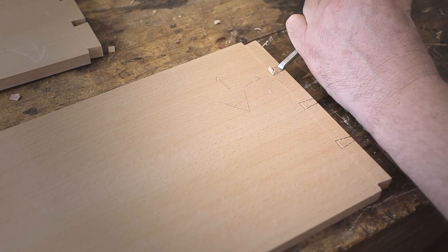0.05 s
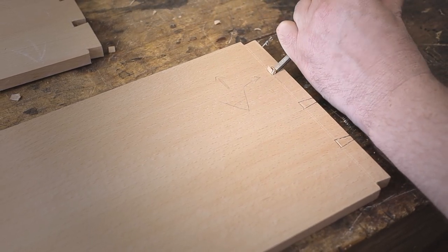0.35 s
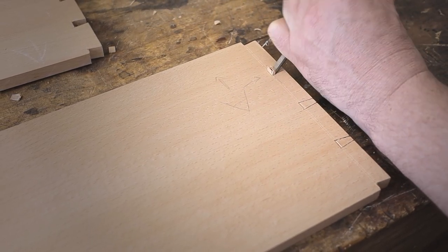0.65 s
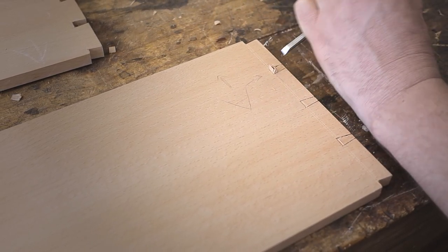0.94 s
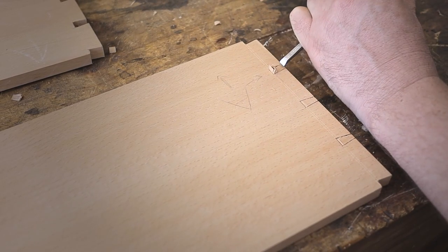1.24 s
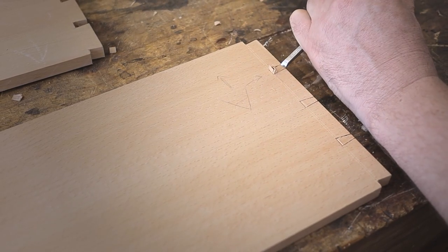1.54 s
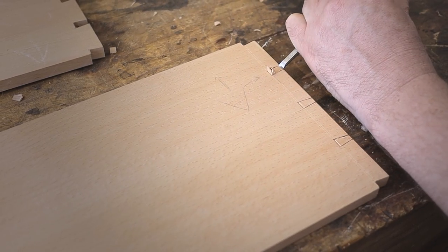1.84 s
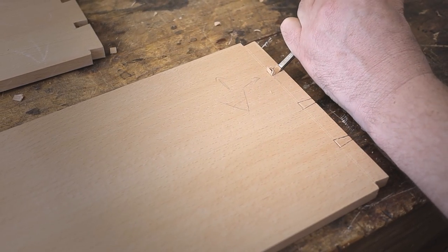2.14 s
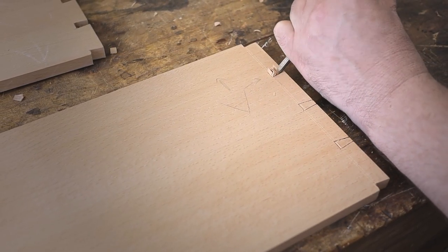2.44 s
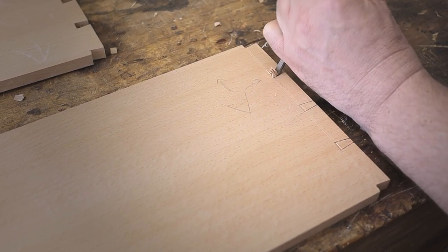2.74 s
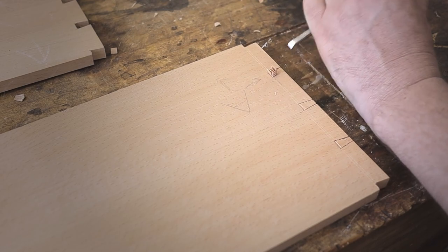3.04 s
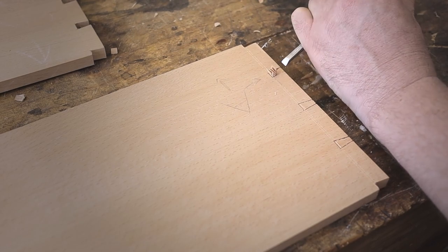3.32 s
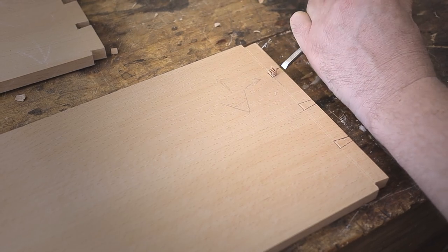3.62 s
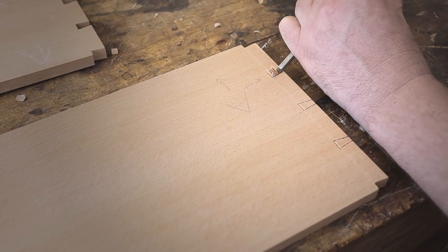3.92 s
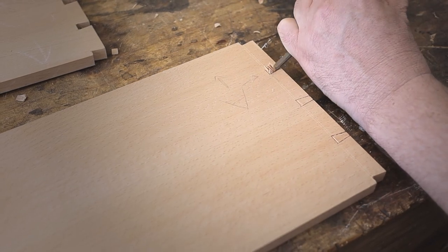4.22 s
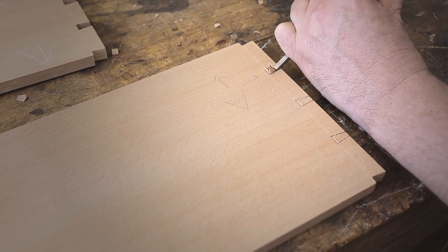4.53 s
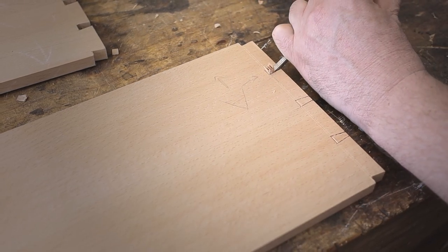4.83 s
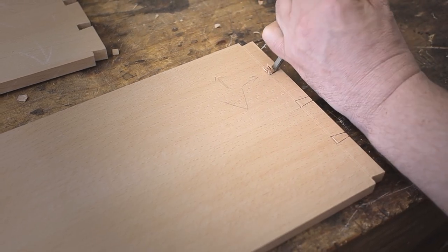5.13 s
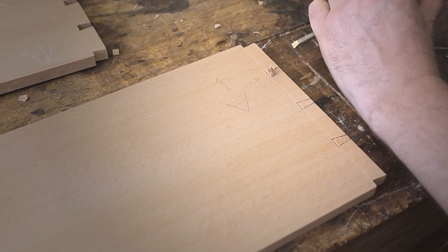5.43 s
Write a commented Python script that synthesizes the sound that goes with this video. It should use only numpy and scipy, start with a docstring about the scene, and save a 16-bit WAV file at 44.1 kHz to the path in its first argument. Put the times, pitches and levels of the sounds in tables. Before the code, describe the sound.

A mallet drives a chisel into a hardwood board on a workbench: three quick, sharp blows, a small tick as the blade is rocked free, and a dull knock on the bench. Four more blows follow. After a pause with faint ticks come two last blows, a click and a brief slide of a hand. The sound is close, in a small workshop that rings briefly over a quiet low background.

```python
"""Chiselling a dovetail socket

A mallet drives a chisel into a hardwood board in three short groups of blows, duller and heavier when
the edge sits deep. After each group the blade is rocked free. Light touches set it again, the workbench
takes a few dull knocks, and at the end a hand slides over it. The small workshop rings after each blow.
A limiter (an automatic volume control) squeezes the blows and lets the background swell back slowly."""
import sys
import numpy as np
from scipy import signal
from scipy.fft import rfft, irfft, next_fast_len
from scipy.io import wavfile
from scipy.ndimage import uniform_filter1d, minimum_filter1d

SR = 44100
rng = np.random.default_rng(int(sys.argv[2]) if len(sys.argv) > 2 else 0)


def digitize_waveform(pressure):
    """Quantize a signal to 16-bit integers and store it at the path in sys.argv[1].

    Rows of a 2-D input are taken as channels; values are limited to [-1, 1].
    """
    field = np.atleast_2d(pressure).T
    bounded = np.clip(field, -1, 1)
    quanta = np.round(bounded * 32767).astype(np.int16)
    wavfile.write(sys.argv[1], SR, quanta)


N = 245637
TIME = np.arange(N) / SR
AGE = np.arange(SR // 4) / SR   # seconds since a hit

# Mallet blows. Each row: start in seconds, strength in dB, depth of the edge from 0 (shallow) to 1 (deep),
# the board's strongest note in Hz, its boost in dB, the chisel's ring in Hz, its boost in dB.
BLOWS = [(0.2248, 11, 0.23, 1134, 5.5, 5220, 8), (0.4313, 11, 0.12, 1170, 4, 3230, 7),
         (0.6293, 10, 0.83, 1306, 3, 4157, 3.5), (2.0892, 15, 0.03, 1560, 5, 5270, 5),
         (2.307, 11.5, 0, 524, 4.5, 4250, 9.5), (2.5067, 8.5, 0.88, 1102, 6, 2950, 4),
         (2.7072, 7.5, 0.92, 1950, 1.5, 3684, 5), (4.7611, 8.5, 0.74, 698, 13, 1890, 5.5),
         (4.9501, 11, 0.93, 1495, 3.5, 3020, 8)]
# The notes of board and chisel pressed on the bench.
# Each row: pitch in Hz, level in dB, ring time in seconds (the time to fade by 60 dB, called t60).
BOARD_NOTES = [(139.5, -32, 0.083), (192, -31.5, 0.021), (286.4, -27.5, 0.037), (381, -13.5, 0.11),
               (451, -20, 0.15), (515.2, -11, 0.075), (586, -12.5, 0.077), (819, -20, 0.041),
               (994.7, -2, 0.02), (1198.7, -4, 0.037), (1305.3, -19.5, 0.03), (1646, -18, 0.013),
               (1683, -16.5, 0.24), (2012, -5, 0.069), (1870, -8, 0.037), (2267, -24, 0.07),
               (2734, -9.5, 0.029), (3034, -9, 0.043), (3580, -13.5, 0.0051), (4020, -11, 0.09),
               (4107, -14, 0.066), (4863, -19, .03)]
# Cracking fibres and the board's crowded high notes. Each row: frequency in Hz, level in dB.
CRACK_COLOUR = [(40, -24), (100, -5.5), (250, -0.5), (600, -1), (1100, 6), (2000, 5), (3000, 3.5),
                (4200, 2), (5400, -3.5), (6200, -11), (8000, -24.5), (10000, -34.5), (12000, -37),
                (16000, -40)]
# The steel blade's crowded high notes. Each row: frequency in Hz, level in dB.
BLADE_COLOUR = [(4000, -24.5), (6500, 5.5), (8200, -3), (9700, 1.5), (10600, -17), (14000, -28)]
# The blade is rocked free, then rebounds off the socket's other wall.
# Each row: start in seconds, level in dB, wait for the rebound in seconds, rebound level in dB.
PULLS = [(0.936, -35.5, 0.016, -38), (2.954, -37, .025, -54.5), (5.2848, -28, .026, -43.5)]
# Light touches of the edge on the wood. Each row: start in seconds, level in dB.
TOUCHES = [(4.2013, -56.5), (4.3544, -57.5), (4.4369, -47.5), (4.492, -57.5), (4.5406, -56), (5.2293, -45)]
# The snap of a touch or a pull. Each row: frequency in Hz, level in dB.
TICK_COLOUR = [(80, -54), (300, -7), (900, 6.5), (1900, 11.5), (3200, 4), (4500, 0), (6700, -4),
               (8000, -19), (14000, -48)]
# Dull knocks on the bench. Each row: start in seconds, level in dB.
KNOCKS = [(0.002, -42.5), (0.9554, -32.5), (1.7632, -15), (1.774, -20.5)]
# The notes of the bench top. Each row: pitch in Hz, level in dB, ring time in seconds.
BENCH_NOTES = [(130, -26.5, 0.074), (175, -11, 0.11), (262, -4.5, .07), (365, -1, 0.067), (476, -7.5, 0.13),
               (550, -7, 0.046), (564.4, -5, 0.034), (790, -14, 0.072), (1150, -18, 0.15)]
# The noisy part of a knock. Each row: frequency in Hz, level in dB.
KNOCK_COLOUR = [(50, -19), (150, -6), (400, 1), (900, -1.5), (1500, -16), (3000, -29), (6000, -43.5),
                (12000, -81)]
# Hand slides. Each row: start in seconds, seconds speeding up, seconds slowing down, level in dB.
SLIDES = [(4.15, 0.11, 0.18, -70), (5.385, 0.083, 0.11, -31)]
# Skin rubbing on the bench. Each row: frequency in Hz, level in dB.
SLIDE_COLOUR = [(80, -17), (190, 3), (260, -2), (400, 3.5), (750, -9.5), (1900, -5.5), (3300, -7.5),
                (4350, -2.5), (5200, -10.5), (6100, -12), (7000, -29), (9300, -28), (10500, -58),
                (14000, -55)]
# The workshop's fading echo. Each row: frequency in Hz, level in dB, ring time in seconds.
ROOM_ECHO = [(60, -8, 1), (151.9, -0.5, 0.32), (306, -0.5, 0.43), (620, 0, 0.34), (1290, -5, 0.34),
             (2437, -3, 0.31), (4430, -4.5, 0.29), (7000, -9.5, 0.25), (9700, -6, 0.047),
             (10900, -25.5, .22)]
# Notes that build up between the walls. Each row: pitch in Hz, gain in dB, ring time in seconds.
STANDING_WAVES = [(131.5, 12, 0.34), (189, 12.5, .55), (242.4, 5, .5), (292.6, 8, .35), (385, -6, 0.12),
                  (457.3, -12.5, 0.27), (597, -9.5, .35)]
# The workshop's steady background noise. Each row: frequency in Hz, level in dB.
HUSH_COLOUR = [(30, -27.5), (55, -12.5), (124, -5), (184, -2), (250, -7.5), (303, -1), (370, -10.5),
               (450, -10), (600, -13.5), (940, -17), (1960, -25), (4300, -34), (8000, -51.5), (16000, -55)]


def mallet_blows():
    """Each blow cracks the wood fibres and sets the board and the chisel ringing."""
    out = np.zeros(N)
    for start, strength_db, depth, note_hz, note_db, ring_hz, ring_db in BLOWS:
        crack = burst(CRACK_COLOUR, t60=between(0.021, 0.05, depth))   # deep cuts tear for longer
        shimmer = from_db(between(-44.5, -43, depth)) * burst(BLADE_COLOUR, t60=0.2)
        board = from_db(-8.5) * struck(BOARD_NOTES, scatter_db=0.5)
        blow = (board + crack + shimmer) * contact(rise_s=0.00024)
        blow = resonance(blow, note_hz, note_db, q=5)
        blow = resonance(blow, ring_hz, ring_db, q=15)   # the steel adds a narrower ring
        # a deeper edge passes more thud to the bench and loses more treble
        blow = bass_and_treble(blow, bass_hz=1000, bass_db=between(0, 7, depth),
                               treble_hz=between(4500, 3500, depth), treble_db=between(-4.5, -5, depth))
        add(out, start, from_db(strength_db) * blow)
    return out


def blade_ticks():
    """A touch ticks once; a pull ticks, snaps a few fibres at random and rebounds with a duller tick."""
    out = np.zeros(N)
    splinter_db = -13   # compared with the pull
    for start, level_db in TOUCHES:
        add(out, start, from_db(level_db) * tick())
    for start, level_db, rebound_s, rebound_db in PULLS:
        add(out, start, from_db(level_db) * tick())
        for share in rng.random(size=3):
            add(out, start + share * rebound_s, from_db(level_db + splinter_db) * tick())
        add(out, start + rebound_s, from_db(rebound_db) * tick(thud_db=9, treble_db=-8))
    return out


def tick(thud_db=5.5, treble_db=-1):
    """Steel meets wood lightly: a short snap and a trace of the board's notes."""
    board = from_db(-7.5) * struck(BOARD_NOTES, scatter_db=3)
    snap = burst(TICK_COLOUR, t60=0.034)
    touch = (snap + board) * contact(rise_s=0.000092)
    return bass_and_treble(touch, 650, thud_db, 6100, treble_db)


def bench_knocks():
    """A soft bump rings only the low notes of the bench."""
    out = np.zeros(N)
    for start, level_db in KNOCKS:
        knock = struck(BENCH_NOTES, scatter_db=0.6) + burst(KNOCK_COLOUR, t60=0.022)
        add(out, start, from_db(level_db) * knock * contact(rise_s=0.0013))
    return out


def hand_slides(slips_per_s, hiss_hz, hiss_q, hiss_db):
    """A hand rubs the rough bench: many tiny slips and a thin hiss, louder as the hand moves faster."""
    slips = (rng.random(N) < slips_per_s / SR) * rng.standard_normal(N)
    hiss = signal.lfilter(*signal.iirpeak(hiss_hz, hiss_q, fs=SR), slips)
    rub = coloured(slips, SLIDE_COLOUR) + from_db(hiss_db) * unit_power(hiss)
    speed = np.zeros(N)
    for start, rise_s, fall_s, level_db in SLIDES:
        speeding_up = np.sin(np.pi / 2 * np.clip((TIME - start) / rise_s, 0, 1)) ** 2
        slowing = np.cos(np.pi / 2 * np.clip((TIME - start - rise_s) / fall_s, 0, 1))
        speed += from_db(level_db) * speeding_up * slowing
    return speed * rub


def struck(notes, scatter_db):
    """An object's own notes ring and fade; every hit sets them off a little differently."""
    hz, db, t60 = np.transpose(notes)[:, :, None]
    strength = from_db(db + scatter_db * rng.standard_normal(hz.shape))
    phase = rng.uniform(0, 2 * np.pi, hz.shape)
    return np.sum(strength * np.sin(2 * np.pi * hz * AGE + phase) * fade(AGE, t60), axis=0)


def burst(colour, t60):
    """Notes packed so closely that they merge into a dying noise."""
    envelope = fade(AGE, t60)
    noise = evened(rng.standard_normal(len(AGE)) * envelope, width_hz=3 / t60)
    # silence in front keeps the start from smearing round to the end
    shaped = coloured(np.concatenate([0 * noise, noise]), colour)[len(AGE):]
    return shaped * np.linalg.norm(envelope) / np.linalg.norm(shaped)


def contact(rise_s):
    """The force builds up as two things meet; a slower rise sounds softer."""
    return 1 - np.exp(-(AGE / rise_s) ** 2)


def resonance(x, hz, boost_db, q):
    """Boost the sound around one pitch; a higher q makes the boost narrower."""
    return x + (from_db(boost_db) - 1) * signal.lfilter(*signal.iirpeak(hz, q, fs=SR), x)


def bass_and_treble(x, bass_hz, bass_db, treble_hz, treble_db):
    """Turn the lows and the highs up or down, like two tone knobs."""
    for hz, step_db, top_db in ((bass_hz, bass_db, 0), (treble_hz, -treble_db, treble_db)):
        corner = 2 * np.tan(np.pi * hz / SR)
        spread = from_db(step_db / 4)
        zeros, poles = [[1, np.sqrt(2) * c, c * c] for c in (corner * spread, corner / spread)]
        x = from_db(top_db) * signal.lfilter(*signal.bilinear(zeros, poles), x)
    return x


def coloured(x, colour):
    """Give a noise its colour (its balance of low and high), at a power of one."""
    hz, db = np.transpose(colour)
    size = next_fast_len(len(x))
    freqs = np.maximum(np.fft.rfftfreq(size, 1 / SR), 1)
    bass_cut = np.minimum(freqs / hz[0], 1) ** 2
    gain = from_db(np.interp(np.log(freqs), np.log(hz), db))
    return unit_power(irfft(rfft(x, size) * bass_cut * gain, size)[:len(x)])


def evened(x, width_hz):
    """Share a noise's energy evenly among bands of this width, for a total of one."""
    spectrum = rfft(x, 2 * len(x))
    power = uniform_filter1d(np.abs(spectrum) ** 2, max(int(width_hz * 2 * len(x) / SR), 1))
    even = irfft(spectrum / np.sqrt(np.abs(power) + 1e-20))[:len(x)]
    return even / np.linalg.norm(even)


def between(shallow, deep, depth):
    """Blend two settings by how deep the edge sits."""
    return shallow + (deep - shallow) * depth


def from_db(db):
    """Turn decibels into a number to multiply by."""
    return 10 ** (np.asarray(db) / 20)


def unit_power(x):
    """Scale a sound to an average power of one."""
    return x / np.sqrt(np.mean(x ** 2) + 1e-20)


def fade(age, t60):
    """Die away by 60 dB every t60 seconds."""
    return from_db(-60 * age / t60)


def add(track, start_s, sound):
    """Mix a sound into the track at its start time."""
    start = round(start_s * SR)
    track[start:start + len(sound)] += sound[:N - start]


def workshop(x, sway_hz):
    """Add echoes whose pattern shifts as the arms move, and the room's own steady notes."""
    out = x.copy()
    for phase in (0, np.pi / 2):
        share = np.cos(2 * np.pi * sway_hz * TIME + phase)
        out += signal.fftconvolve(x * share, echoes(build_s=0.011, early_db=-5.5, early_t60=0.057))[:N]
    hz, gain_db, t60 = np.transpose(STANDING_WAVES)[:, :, None]
    age = np.arange(SR) / SR
    envelope = fade(age, t60)
    envelope /= envelope.sum(axis=1, keepdims=True)
    waves = from_db(gain_db) * 2 * np.cos(2 * np.pi * hz * age) * envelope
    return out + signal.fftconvolve(x, waves.sum(axis=0))[:N]


def echoes(build_s, early_db, early_t60):
    """Quick bounces off the bench, then a tail that dies faster in the treble."""
    age = np.arange(SR) / SR
    onset = 1 - np.exp(-(age / build_s) ** 2)
    early = evened(rng.standard_normal(SR) * onset * fade(age, early_t60), width_hz=39)
    response = from_db(early_db) * signal.sosfilt(signal.butter(3, 4500, fs=SR, output="sos"), early)
    log_freqs = np.log(np.maximum(np.fft.rfftfreq(SR, 1 / SR), 1))
    log_centres = np.log([hz for hz, _, _ in ROOM_ECHO])
    longest = max(t60 for _, _, t60 in ROOM_ECHO)
    tail = rfft(evened(rng.standard_normal(SR) * fade(age, longest), width_hz=8.5))
    for (_, level_db, t60), this_band in zip(ROOM_ECHO, np.eye(len(ROOM_ECHO))):
        band = irfft(tail * np.interp(log_freqs, log_centres, this_band), SR)
        absorbed = fade(age, t60) / fade(age, longest) * np.sqrt(longest / t60)
        response += from_db(level_db) * band * absorbed * onset
    return response[:2 * SR // 3]


def hush(level_db):
    """The workshop's quiet, steady background: a low, soft noise."""
    return from_db(level_db) * coloured(rng.standard_normal(N), HUSH_COLOUR)


def limiter(x, ceiling_db, hold_s, fast_db_per_s, slow_db, slow_db_per_s):
    """The volume drops just before a peak, holds, then comes back: fast, but slowly for the last part."""
    over_db = np.maximum(20 * np.log10(np.abs(x) + 1e-9) - ceiling_db, 0)
    hold, ahead = 2 * int(hold_s * SR / 2) + 1, SR // 1000   # in samples
    held_db = -minimum_filter1d(-over_db, hold, origin=hold // 2)
    fast_cut = wear_off(held_db, fast_db_per_s)
    slow_cut = wear_off(np.minimum(held_db, slow_db), slow_db_per_s)
    early_cut = -minimum_filter1d(-np.maximum(fast_cut, slow_cut), ahead)
    return x * from_db(-uniform_filter1d(early_cut, ahead))


def wear_off(cut_db, db_per_s):
    """Let a cut in volume shrink at a steady rate."""
    return np.maximum.accumulate(cut_db + db_per_s * TIME) - db_per_s * TIME


def scene():
    """All the handwork in the workshop, over its quiet background."""
    work = mallet_blows() + bench_knocks() + blade_ticks()
    work += hand_slides(slips_per_s=19000, hiss_hz=4320, hiss_q=29, hiss_db=-13)
    # the bench is too small to give off deep bass
    work = signal.sosfilt(signal.butter(3, 90, "high", fs=SR, output="sos"), work)
    return (hush(level_db=-57.5) + workshop(work, sway_hz=0.9))[None]


def record(dry):
    """Squeeze the blows, round off their peaks, and cut the deepest bass and the highest treble."""
    limited = limiter(dry[0], ceiling_db=1.5, hold_s=0.039, fast_db_per_s=259.5,
                      slow_db=10, slow_db_per_s=5.5)
    rounded = limited / (1 + (limited / 0.7) ** 4) ** 0.25
    trimmed = signal.sosfilt(signal.butter(2, [80, 11500], "band", fs=SR, output="sos"), rounded)
    steep_top_cut = signal.ellip(10, 0.1, 80, 16300, fs=SR, output="sos")
    return signal.sosfilt(steep_top_cut, trimmed)[None]


dry = scene()
out = record(dry)
digitize_waveform(out)
```